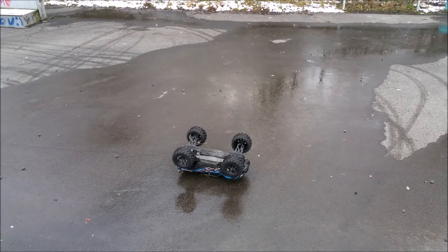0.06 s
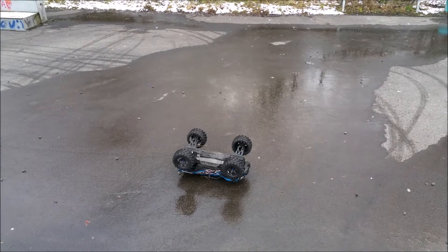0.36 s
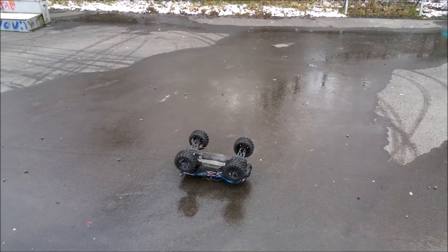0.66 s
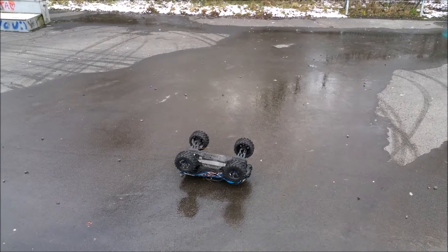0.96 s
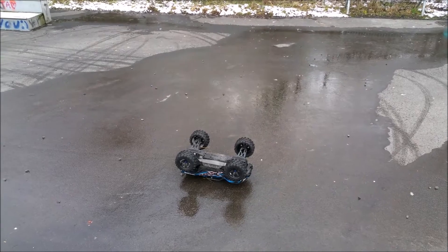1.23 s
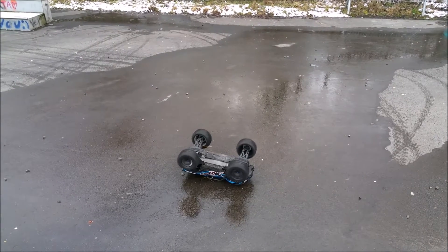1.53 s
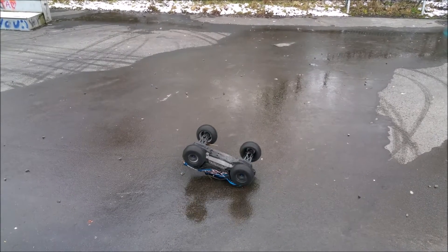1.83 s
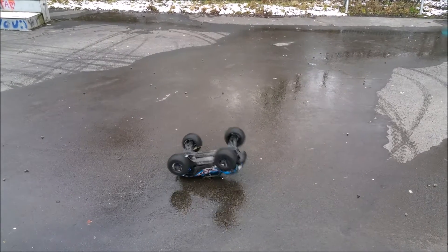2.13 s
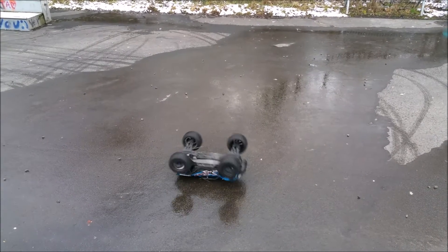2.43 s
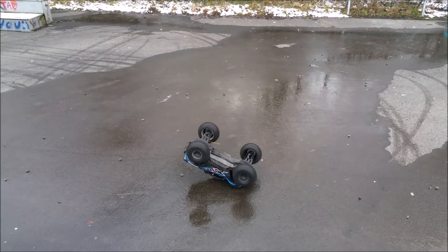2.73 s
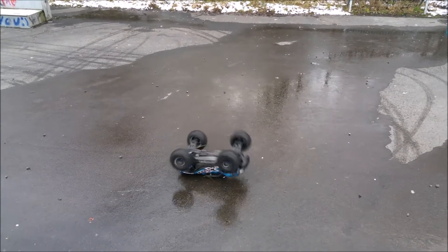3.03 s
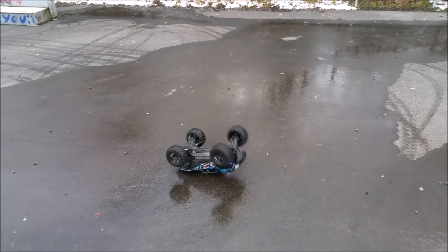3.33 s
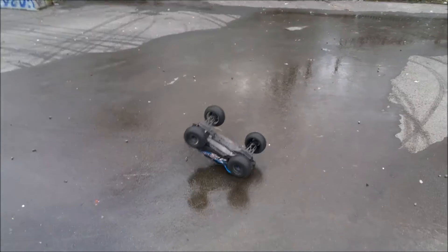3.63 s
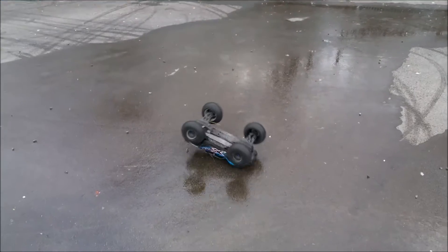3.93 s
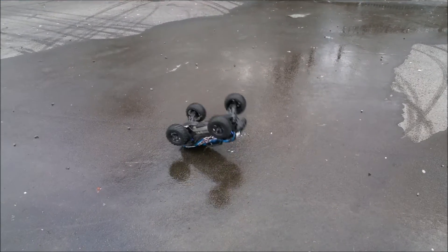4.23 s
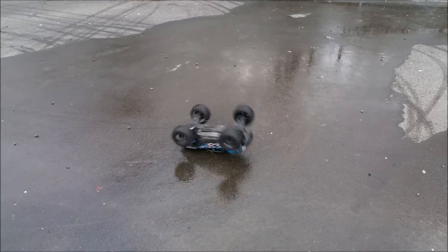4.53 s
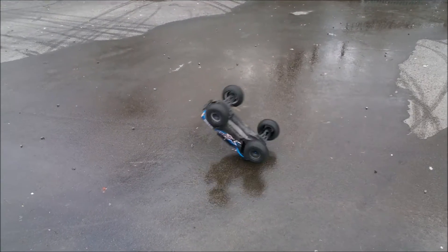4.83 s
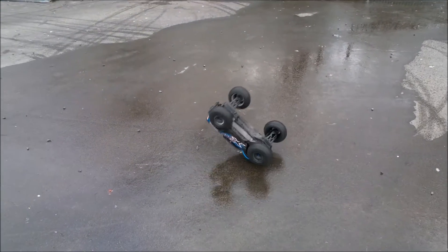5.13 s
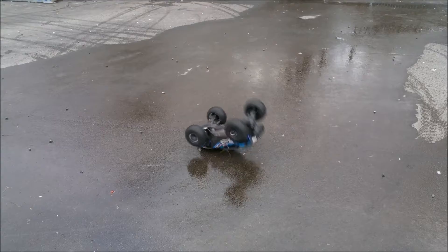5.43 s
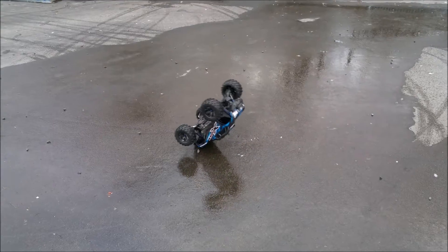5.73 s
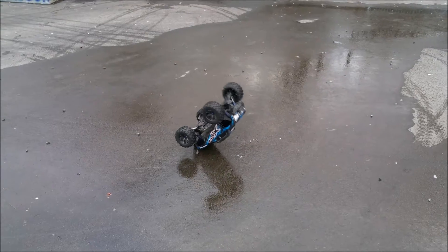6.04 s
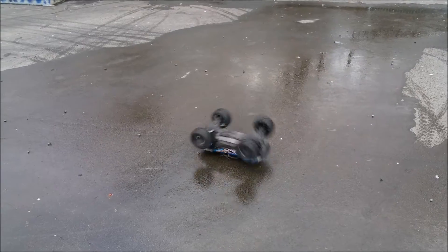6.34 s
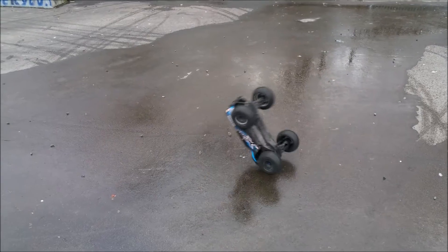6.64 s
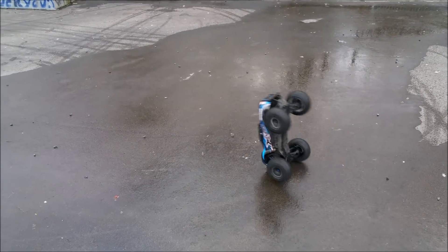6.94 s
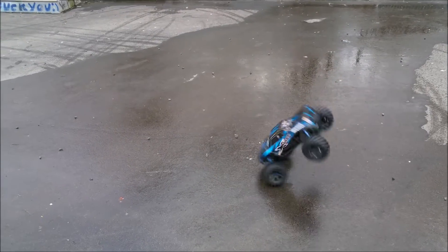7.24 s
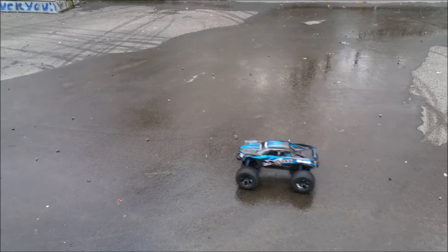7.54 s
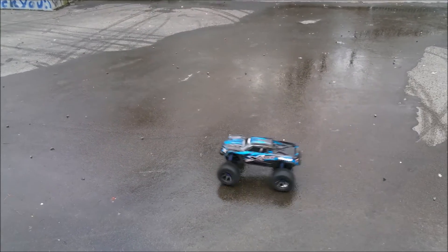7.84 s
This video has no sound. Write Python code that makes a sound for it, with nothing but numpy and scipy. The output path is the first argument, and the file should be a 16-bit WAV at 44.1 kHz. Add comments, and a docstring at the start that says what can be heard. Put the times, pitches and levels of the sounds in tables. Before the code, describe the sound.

Five rising whines from a small electric toy truck each stop in a harsh gear rattle, while its plastic shell knocks against asphalt.

```python
"""A yard of wet asphalt. Near a stereo microphone, a radio-controlled truck lies on its roof.
Five times its motor spins the wheels up and brakes hard, rocking the plastic shell against the ground,
until the truck flips over and lands on its tyres. The gears whine and rattle, the brake judders,
a cooling fan hisses, wet rubber and plastic squeal. Far off, a bird calls over the outdoor hum."""
import sys
import numpy as np
from scipy import signal
from scipy.fft import rfft, irfft, next_fast_len
from scipy.io import wavfile
from scipy.ndimage import uniform_filter1d, map_coordinates

SR = 44100
rng = np.random.default_rng(int(sys.argv[2]) if len(sys.argv) > 2 else 0)


def to_wav(sig):
    """Store sig (one row per channel, or 1-D mono) as 16-bit WAV at the path in sys.argv[1].

    Samples outside -1..1 are clipped; the rate is SR.
    """
    pcm = np.clip(np.atleast_2d(sig), -1, 1) * 32767
    pcm = np.round(pcm).astype(np.int16)
    wavfile.write(sys.argv[1], SR, pcm.T)  # frames by channels


N = 347508
T = np.arange(N) / SR

# Throttle bursts, each ended by the brake: throttle_s, brake_s, bite_length_s, mesh_db, rattle_db,
# winding_db, throb_db, clash_db, rumble_db, grind_fall_db_per_s
BURSTS = [(1.566, 2.081, 0.16, -2, -25, -37, -28, -35.5, -31, 157),
          (2.496, 3.084, 0.16, 0, -25.5, -36.5, -25, -34.5, -29, 145),
          (3.495, 4.158, 0.12, 0.5, -25, -37, -29.5, -34.5, -29.5, 138),
          (4.62, 5.505, 0.091, 1, -23.5, -37, -44, -35, -33.5, 153),
          (6.385, 7.175, 0.076, 2, -23.5, -46, -50, -37.5, -31, 88)]
# Motor speeds from labouring to running free: turns_per_s
SPEEDS = [103, 248, 440, 615, 665]
# Hollow rumble of chassis and tyres: frequency_hz, level_db
RUMBLE = [(70, -37.5), (140, 3), (200, 4), (320, 4), (450, -5.5), (650, -37.5)]
# Deep judder of the chassis: frequency_hz, level_db
JUDDER = [(15, -62), (30, -37), (48, -7.5), (70, -0.5), (95, -1.5), (130, -4.5), (220, -60)]
COAST_S, STOP_S = 0.03, 0.27  # the motor coasts just before the brake, then is braked to a stop


def amp(db):
    """Decibels to gain."""
    return np.exp(np.asarray(db) * (np.log(10) / 20))


def along(points, hz):
    """A curve of (frequency_hz, value) points, read on a log frequency axis."""
    frequencies, values = np.transpose(points)
    return np.interp(np.log(hz + 1), np.log(frequencies + 1), values)


def gate(start, end, fade=0.024):
    """One between two times, with ramps of fade seconds."""
    return np.clip((T - start) / fade + .5, 0, 1) * np.clip((end - T) / fade + .5, 0, 1)


def swell(age, attack_s, hold_s, fall_db_per_s):
    """An envelope that rises from age zero and dies away after hold_s."""
    return np.clip(age / attack_s, 0, 1) * amp(-fall_db_per_s * np.maximum(age - hold_s, 0))


def wobble(rate):
    """A smooth random curve, rate knots a second."""
    knots = rng.standard_normal(int(N * rate / SR) + 4)
    steps = np.arange(len(knots) * 6) / 6
    return np.interp(T * rate, steps, map_coordinates(knots, [steps]))


def turning(hz):
    """Phase of something that turns at this rate."""
    return 2 * np.pi * np.cumsum(hz) / SR


def filtered(x, response):
    """x through a complex response, given as a function of frequency."""
    size = next_fast_len(N + 8192)
    return irfft(rfft(x, size) * response(np.fft.rfftfreq(size, 1 / SR)), size)[..., :N]


def ringing(x, spectrum, size=4096):
    """x through a minimum-phase filter with this spectrum."""
    gain = amp(along(spectrum, np.fft.rfftfreq(size, 1 / SR)))
    cepstrum = irfft(np.log(gain + 1e-6))
    cepstrum[1:size // 2] *= 2
    cepstrum[size // 2 + 1:] = 0
    return signal.fftconvolve(x, irfft(np.exp(rfft(cepstrum))))[:len(x)]


def noise(spectrum, flutter=1):
    """Noise of rms 1 that flutters, then rings with a spectrum."""
    x = ringing(flutter * rng.standard_normal(N), spectrum)
    return x / np.sqrt(np.mean(x ** 2) + 1e-20)


def burst():
    """The columns of the latest throttle burst at every moment."""
    rows = np.array(BURSTS)
    return rows.T[:, np.maximum(np.searchsorted(rows[:, 0], T) - 1, 0)]


def throttle(delay_s):
    """One from a little after the throttle opens until the brake comes on."""
    return sum(gate(on + delay_s, brake_on) for on, brake_on, *_ in BURSTS)


def outdoor_hum(level_db=-56):
    """The steady, low background of the open air."""
    # Distant hum: frequency_hz, level_db
    spectrum = [(13, -33), (22, -33), (49, -2.5), (118, -8.5), (173, -9), (228, -14), (269, -14.5),
                (335, -11.5), (396, -12.5), (493, -26), (535, -18.5), (2500, -32), (5110, -35),
                (6200, -44.5), (15800, -48.5)]
    return amp(level_db) * noise(spectrum)


def bird(pitch_hz=2690, droop_hz=210):
    """A far bird: each thin whistle swells, then droops at its end."""
    # Calls: start_s, end_s, level_db
    calls = [(0.17, 0.364, -62.5), (1.47, 1.68, -68)]
    out = np.zeros(N)
    for start, end, db in calls:
        progress = np.clip((T - start) / (end - start), 0, 1)
        pitch = pitch_hz - droop_hz * progress ** 4
        out += amp(db) * np.sin(np.pi * progress) * np.sin(turning(pitch))
    return out


def knocks(crack_t60_s=0.022, chatter_t60_s=1.0, chatter_db=-18, treble_hz=4000):
    """Each blow is a plastic crack with a chattering tail and a hollow thump of the shell."""
    # Shell or tyres hit the ground, or the gears take up their slack:
    # start_s, relative_crack_db, relative_thump_db, contact_s, treble_db
    blows = [(1.565, -21, -64, 0.0027, -7), (2.494, -23.5, -35, 0.0063, -17),
             (3.389, -28.5, -33, 0.004, -5), (3.455, -29, -40, 0.0058, -5), (3.496, -23, -44, 0.004, -12),
             (3.513, -20.5, -29.5, 0.012, -4), (3.734, -2, -27, 0.00034, 4), (4.618, -16.5, -58, 0.0042, 2),
             (4.817, -16, -22, 0.0043, 0), (6.182, -32.5, -51, 0.0023, 5), (6.382, -20.5, -60, 0.0077, -11),
             (6.486, -15.5, -33, 0.0057, 0), (6.566, -13, -25.5, 0.0056, 2), (7.192, -9, -40, 0.002, 2),
             (7.412, -29, -42, 0.0025, 3), (7.462, -26, -45, 0.0073, -2), (7.549, -8, -22, 0.00085, -8),
             (7.563, -20.5, -28, 0.011, 3), (7.746, -30, -42, 0.0031, -7), (7.775, -30, -58, 0.0042, -5)]
    # Modes of the shell: pitch_hz, level_db, undamped_t60_s
    shell_modes = [(188, -3.5, 1.1), (258, -7, 0.79), (467, 0, 0.078), (552, -3.5, 0.41), (553, -35, 5.0)]
    # Crack of the plastic: frequency_hz, level_db
    plastic = [(180, -8.5), (300, -4.5), (907, 2.5), (1870, 2.5), (2830, -2), (4420, -15), (5760, -11.5),
               (6360, -37), (9930, -20), (13400, -44), (15500, -74)]
    out, t = np.zeros(N + SR), np.arange(SR // 2) / SR
    for start, crack_db, thump_db, contact_s, treble_db in blows:
        contact = swell(t, contact_s / 2, contact_s, 60 / crack_t60_s)
        chatter = amp(chatter_db - 60 * t / chatter_t60_s)
        spectrum = [(hz, db + treble_db * (hz > treble_hz)) for hz, db in plastic]
        crack = ringing((contact + chatter) * rng.standard_normal(len(t)), spectrum)
        thump = np.zeros(len(t))
        for hz, db, t60 in shell_modes:
            damped_t60 = 0.59 * min(t60, .3)
            decay = amp(db + rng.normal(0, 6.8) - 60 * t / damped_t60)
            thump += decay * np.sin(2 * np.pi * hz * rng.normal(1, 0.017) * t)
        crack *= amp(crack_db - 1) / np.abs(crack).max()
        thump *= amp(thump_db + 4) / np.abs(thump).max()
        out[round(start * SR):][:len(t)] += crack + thump
    return out[:N]


def cooling_fan(level_db=-49.5, rise_s=1.07, run_on_s=0.36, fall_db_per_s=28):
    """The fan's hiss builds from each opening of the throttle and runs on after the brake."""
    # Air through the fan: frequency_hz, level_db
    hiss = [(1060, -19), (1800, -21), (2080, -21), (2320, 0.5), (2580, -36), (2850, -7), (3320, -11.5),
            (4350, -3.5), (6130, -17), (7020, -14), (7820, -16.5), (11300, -20), (15500, -33)]
    running = [swell(T - on, rise_s, brake_on - on + run_on_s, fall_db_per_s)
               for on, brake_on, *_ in BURSTS]
    return amp(level_db) * np.max(running, axis=0) * noise(hiss)


def idle_whine(pitch_hz=2330, level_db=-57):
    """A thin electronic whine that stays on once the truck has been driven."""
    pitch = pitch_hz * (1 + 0.0134 * wobble(180))
    return amp(level_db) * (T > BURSTS[0][0]) * np.sin(turning(pitch))


def motor_speed(sag_hz_per_s=600):
    """Turns per second: the motor spins up, sags as the throttle is let go, and is braked."""
    # The same spin-up in every burst: since_throttle_s, turns_per_s
    spin_up = [(0.025, 15), (0.07, 87), (0.214, 390), (0.264, 463), (0.314, 529), (0.364, 579),
               (0.424, 630), (0.484, 650), (0.85, 664)]
    on, brake_on, *_ = burst()
    driven = np.interp(T - on, *np.transpose(spin_up))
    sag = sag_hz_per_s * np.clip(T - brake_on + COAST_S, 0, COAST_S)
    braked = np.clip(1 - (T - brake_on) / STOP_S, 0, 1)
    return uniform_filter1d(np.maximum((driven - sag) * braked, spin_up[0][1]), size=900)


def rattle(speed, wheel_phase, peak_turns_per_s=630, stall_share=0.14, coast_db=-7.5, tyre_db=-40):
    """Loose teeth clatter, harder with speed and once a wheel turn; the spinning tyres flutter."""
    # Resonance of gearbox and chassis: frequency_hz, level_db
    gearbox = [(350, -15), (520, -3.5), (750, -3), (1000, -6), (1300, 1.5), (2100, -2), (2600, 1.5),
               (3500, -10), (4200, -7.5), (5200, -11.5), (6200, -25.5), (8000, -23.5), (9800, -23),
               (11500, -29.5), (15500, -45.5)]
    _, brake_on, _, _, rattle_db, *_ = burst()
    clatter = amp(-0.77 * np.cos(wheel_phase) + 2.5 * wobble(1400) + 0.9 * wobble(130))
    # unloaded gears rattle less, whether running free or coasting
    eased_db = np.interp(speed, [peak_turns_per_s, SPEEDS[-1]], [0, -3.73])
    coasting = np.clip((T - brake_on) / COAST_S + 1, 0, 1)
    effort = stall_share + (1 - stall_share) * np.minimum(speed / peak_turns_per_s, 1)
    gears = amp(rattle_db + eased_db + coast_db * coasting) * effort * noise(gearbox, clatter)
    tyres = amp(tyre_db) * (speed / SPEEDS[-1]) ** 0.29 * noise(RUMBLE, clatter)
    return throttle(delay_s=0.005) * (gears + tyres)


def motor_whine(speed, wheel_phase, flicker_db=3, runout=0.21, eccentric_rad=0.029):
    """Motor and gear tones; off-centre gears swell once a wheel turn and rock once a motor turn."""
    # Motor hum, then the gear mesh tones: multiple_of_motor_speed, level_db at each of SPEEDS
    orders = [ (0.989, -63, -51.5, -48.5, -37.5, -36), (1.417, -67, -86, -31, -38, -46.5),
              (2.022, -106, -60, -92, -67.5, -46), (2.205, -47, -71, -44.5, -64.5, -64),
              (2.847, -60, -44, -36, -33.5, -46.5), (4.15, -59, -50, -44, -38.5, -47),
              (4.31, -53, -44.5, -41, -42, -42.5), (5.577, -46, -46, -38.5, -38.5, -38),
              (11.01, -47, -45.5, -44.5, -47.5, -67), (15.05, -35.5, -46.5, -46.5, -49.5, -59),
              (23.2, -44, -76, -74, -74, -82), (30.4, -75, -51, -55, -77, -85), ]
    # The hum fades and returns in the long bursts: time_s, gain_db
    hum_drift = [(4.2, 9), (5.08, 8), (5.16, 0), (5.28, -3.5), (5.45, 8), (6.85, 7), (6.97, -2), (7.18, 4)]
    # Housing resonances, which flare as a tone sweeps through: centre_hz, width_hz, gain_db
    resonances = [(1240, 254, 9), (1728, 113, 3), (2340, 1000, 7), (4650, 930, 7), (5420, 190, 10.5),
                  (6660, 96, 15.5), (9130, 1170, 9)]

    def housing(hz):
        return amp(sum(db / (1 + (2 * (hz - centre) / width) ** 2) for centre, width, db in resonances))

    shaft = turning(speed * (1 + 0.0015 * wobble(50)))
    shaft += eccentric_rad * np.sin(shaft)
    _, _, _, mesh_db, *_ = burst()
    hum_db = np.interp(T, *np.transpose(hum_drift))
    tones = np.zeros(N)
    for k, (order, *levels) in enumerate(orders):
        swing_db = mesh_db + flicker_db * wobble(22) if k else hum_db + wobble(22)
        level = amp(np.interp(speed, SPEEDS, levels) + swing_db)
        per_turn = 1 + runout * np.cos(wheel_phase + rng.uniform(0, 2 * np.pi))
        # play between the teeth smears the high tones most
        backlash = 0.15 * np.clip(speed / SPEEDS[1], 0, 1) * wobble(330)
        tones += np.sqrt(2) * level * per_turn * np.sin(order * (shaft + backlash))
    starting = np.clip(speed / SPEEDS[0], 0, 1) ** 2
    return throttle(delay_s=0.037) * filtered(tones * starting, housing)


def controller_tone(speed, chop_hz=4010, level_db=-45):
    """The speed controller chops the current, and sings, until the throttle is fully open."""
    part_throttle = np.clip((310 - speed) / 60, 0, 1)
    return amp(level_db) * throttle(delay_s=0.038) * part_throttle * np.sin(2 * np.pi * chop_hz * T)


def brake(speed, chop_hz=754, attack_s=0.012, skips_per_s=60, skip_s=0.0033,
          grind_db=-20.5, whir_db=-49, judder_db=-33.5):
    """The brake bites in pulses: teeth clash and skip, the chassis judders and the windings sing."""
    _, brake_on, bite_s, _, _, winding_db, throb_db, clash_db, rumble_db, grind_fall = burst()
    age = T - brake_on

    def held(fall_db_per_s):
        return swell(age, attack_s, bite_s, fall_db_per_s)

    chop = 2 * np.pi * chop_hz * T
    pulse = np.cos(chop / 8 + .5 * wobble(25))
    speed_share = speed / SPEEDS[-1]
    moving = speed_share ** 0.44  # the clatter smooths out as the wheels stop
    slips = 1.0 * (rng.random(N) < skips_per_s / SR)
    skips = signal.lfilter([1], [1, -np.exp(-1 / (skip_s * SR))], slips)
    roughness_db = -pulse + 1.6 * wobble(1200) + 2 * wobble(170)
    teeth = amp(moving * roughness_db) * (1 + 0.61 * moving * skips)
    # Grinding gears: frequency_hz, level_db
    grinding = [(300, -24), (550, 1.5), (1300, 5), (2100, 3), (2900, 3.5), (3500, -6.5), (4200, -6.5),
                (5200, -6), (6200, -19.5), (9000, -56)]
    whir = amp(whir_db) * held(fall_db_per_s=12)  # lingers after each stop
    grind = np.hypot(amp(grind_db) * held(grind_fall), whir) * noise(grinding, teeth)
    # Bright clash of the teeth: frequency_hz, level_db
    clashing = [(3530, -1), (6000, -25), (6800, -1), (8060, -5.5), (9180, 2), (11400, -11), (14900, -18),
                (15400, -20), (15800, -38)]
    clash = amp(clash_db) * held(177) * noise(clashing, teeth * amp(-3 * pulse))
    rumble = amp(rumble_db) * held(106) * noise(RUMBLE, teeth)
    judder = held(188) * (amp(judder_db) * noise(JUDDER) + amp(throb_db) * pulse)
    current = swell(age, attack_s, STOP_S, 150) * speed_share ** 0.46
    windings = amp(winding_db + 1.3 * wobble(40)) * (2 * np.sin(chop) + 2.66 * np.sin(2 * chop))
    return grind + clash + rumble + judder + current * windings


def rocking(attack_s=0.007, fall_db_per_s=337, lump_db=2):
    """The truck's weight rolls onto shell or tyres: a hollow rumble over a deep thud."""
    # Rocks and bounces: start_s, length_s, rumble_db, thud_db
    rocks = [(2.49, 0.03, -31.5, -38.5), (2.707, 0.035, -30.5, -37), (2.838, 0.023, -35, -44),
             (3.451, 0.1, -35, -43.5), (3.732, 0.024, -24, -37.5), (4.102, 0.017, -28.5, -43),
             (4.442, 0.03, -48, -58), (4.68, 0.023, -33, -48), (4.81, 0.029, -34.5, -39),
             (5.438, 0.022, -31, -51), (6.477, 0.014, -25.5, -50), (6.561, 0.018, -21.5, -37),
             (7.302, 0.067, -28.5, -50), (7.43, 0.1, -45, -51), (7.555, 0.037, -28.5, -27.5),
             (7.614, 0.03, -34, -56), (7.7, 0.043, -46, -54)]
    hollow, deep = np.zeros(N), np.zeros(N)
    for start, length_s, rumble_db, thud_db in rocks:
        contact = swell(T - start, attack_s, length_s, fall_db_per_s)
        hollow += amp(rumble_db) * contact
        deep += amp(thud_db) * contact
    return hollow * noise(RUMBLE, amp(lump_db * wobble(130))) + deep * noise(JUDDER)


def squeals(unsteady=0.054, slip_db=3):
    """Wet rubber and plastic stick and slip on the asphalt, giving a rough, unsteady tone."""
    # Slides: start_s, end_s, first_pitch_hz, last_pitch_hz, level_db
    slides = [(5.569, 5.657, 2070, 2253, -20), (7.217, 7.274, 303.5, 318.6, -18.5),
              (7.264, 7.364, 401.7, 294, -24.5)]
    out = np.zeros(N)
    for start, end, first_hz, last_hz, db in slides:
        pitch = np.interp(T, [start, end], [first_hz, last_hz]) * (1 + unsteady * wobble(400))
        out += amp(db + slip_db * wobble(150)) * gate(start, end, fade=0.067) * np.sin(turning(pitch))
    return out


def falling_whistles(high_hz=15500, low_hz=9900, blur=.025):
    """A faint whistle slides down twice, as the fan or motor spins down after the brake."""
    # Falling whistles: start_s, end_s, level_db
    whistles = [(6.167, 6.356, -61.5), (7.775, 7.96, -60)]
    out = np.zeros(N)
    for start, end, db in whistles:
        pitch = np.interp(T, [start, end], [high_hz, low_hz]) * (1 + blur * wobble(500))
        out += amp(db) * gate(start, end, fade=0.019) * np.sin(turning(pitch))
    return out


def yard_echo(sound, level_db=-21):
    """The yard answers with a faint, diffuse tail whose treble dies first."""
    # Decay of the yard: frequency_hz, t60_s
    decay_times = [(200, 0.68), (2000, 0.23), (10000, 0.022)]
    hz, t, spectra = signal.stft(rng.standard_normal(SR // 2), SR, nperseg=256)
    decay = amp(-60 * t / along(decay_times, hz)[:, None])
    _, tail = signal.istft(spectra * decay, SR, nperseg=256)
    return amp(level_db) * signal.fftconvolve(sound, tail / np.linalg.norm(tail))[:N]


def microphone(direct, diffuse, lead_s):
    """The left port faces the sound; the right hears it lead_s later, duller and partly scattered."""
    # Shading of the right port: frequency_hz, left_minus_right_db
    left_bias = [(60, .8), (380, 2.2), (1300, 4.2), (2400, 4.2), (3600, 7), (4500, 17), (6500, 21),
                 (9000, 21), (15000, 12)]
    # Likeness of the two ports: frequency_hz, coherence
    likeness = [(100, .99), (700, .98), (1400, .95), (3000, .88), (6000, .6), (12000, .35)]
    bias = lambda hz: amp(along(left_bias, hz))
    alike = lambda hz: np.clip(along(likeness, hz), 0, 1)
    shaded = lambda hz: 2 / (1 + bias(hz))
    left = filtered(direct, lambda hz: shaded(hz) * bias(hz))
    right = filtered(direct, lambda hz: shaded(hz) * alike(hz) * np.exp(-2j * np.pi * hz * lead_s))
    right += filtered(diffuse, lambda hz: shaded(hz) * np.sqrt(1 - alike(hz) ** 2))
    return np.array([left, right])


def scene(gear_ratio=9.2):
    """The truck near the microphone and to its left, with hum and bird in the distance."""
    far = microphone(outdoor_hum() + bird(), outdoor_hum(), lead_s=0)
    speed = motor_speed()
    wheel_phase = turning(speed / gear_ratio)
    truck = knocks() + cooling_fan() + idle_whine()
    truck += rattle(speed, wheel_phase) + motor_whine(speed, wheel_phase) + controller_tone(speed)
    truck += brake(speed) + rocking() + squeals() + falling_whistles()
    truck += yard_echo(truck)
    # the whirling wheels scatter sound in ever-changing phase
    analytic = signal.hilbert(truck, next_fast_len(N))[:N]
    scattered = np.real(analytic * np.exp(1j * np.pi * wobble(60)))
    return far + microphone(truck, scattered, lead_s=.00008)


def record(dry, top_hz=15800):
    """The recorder keeps nothing above its band limit."""
    return filtered(dry, lambda hz: hz < top_hz)


dry = scene()
out = record(dry)
to_wav(out)
```